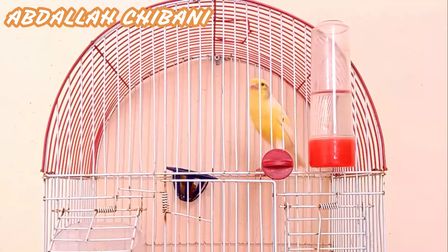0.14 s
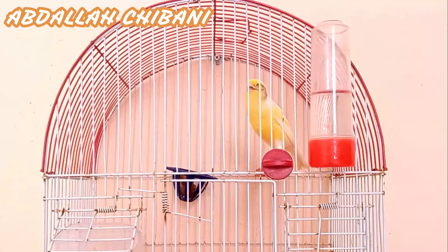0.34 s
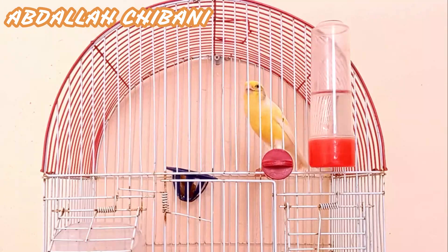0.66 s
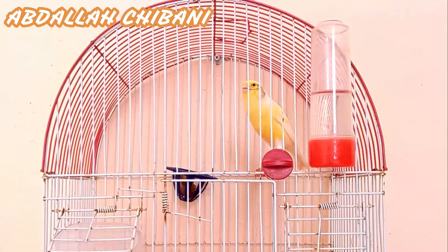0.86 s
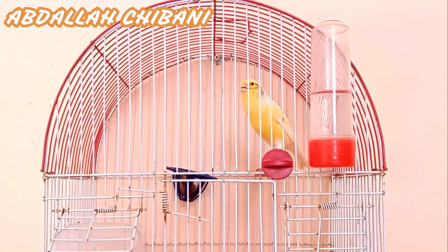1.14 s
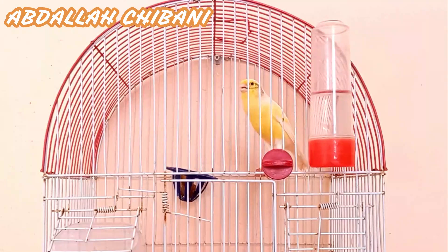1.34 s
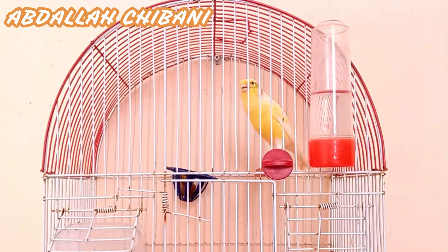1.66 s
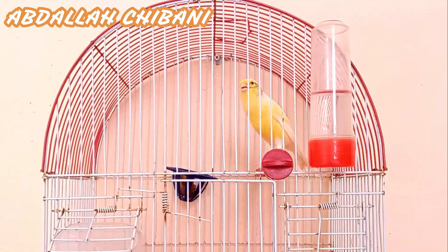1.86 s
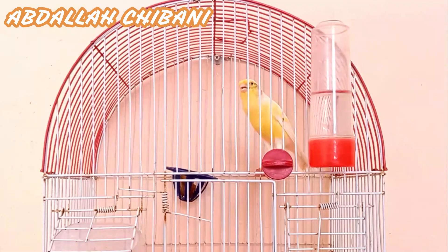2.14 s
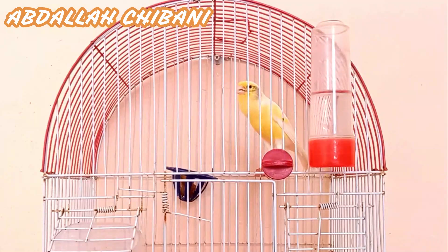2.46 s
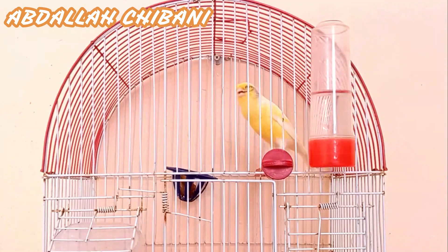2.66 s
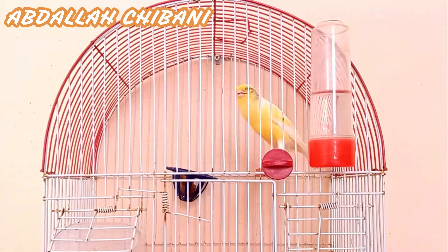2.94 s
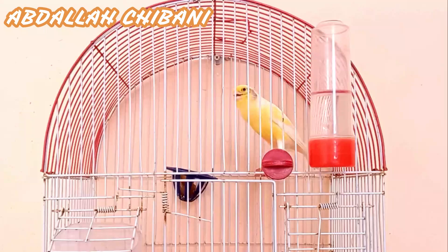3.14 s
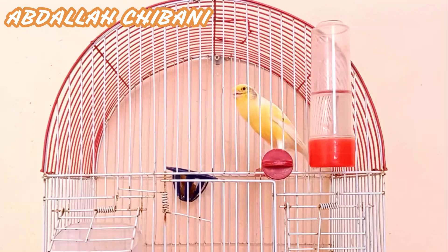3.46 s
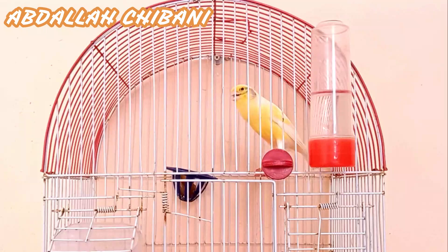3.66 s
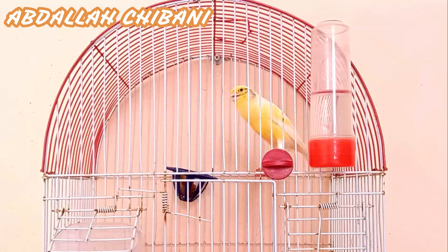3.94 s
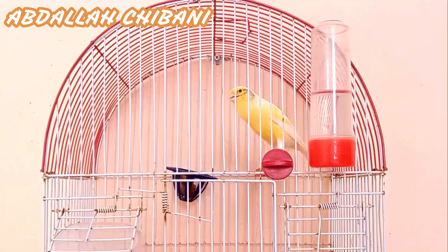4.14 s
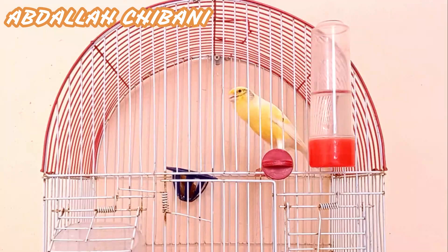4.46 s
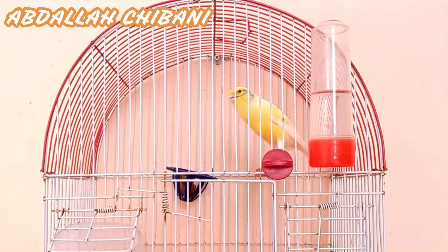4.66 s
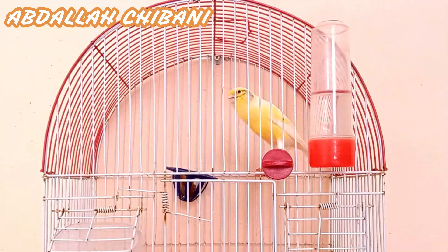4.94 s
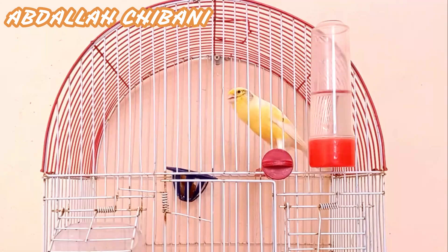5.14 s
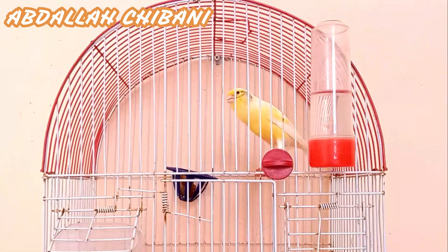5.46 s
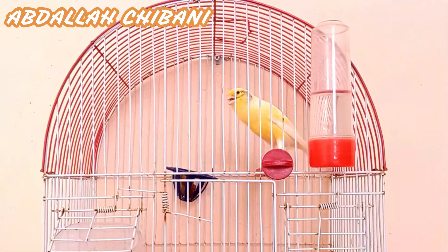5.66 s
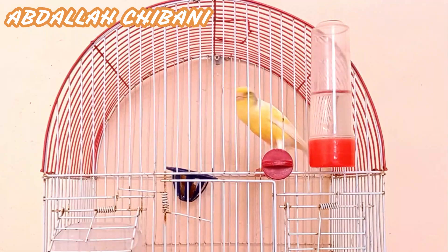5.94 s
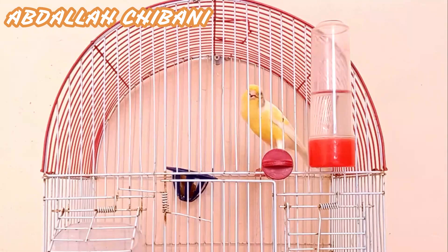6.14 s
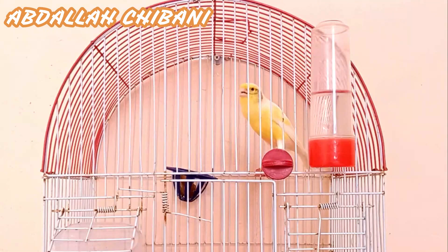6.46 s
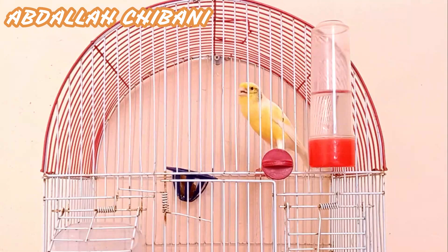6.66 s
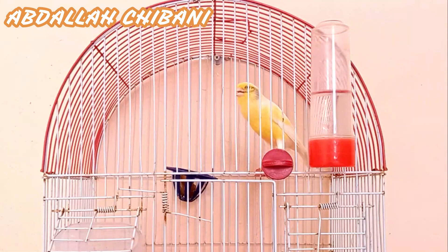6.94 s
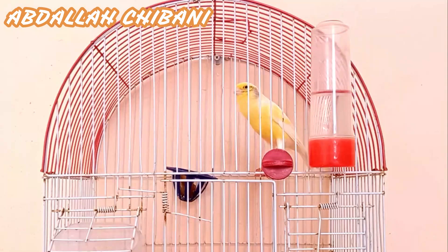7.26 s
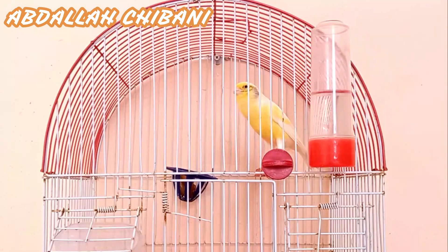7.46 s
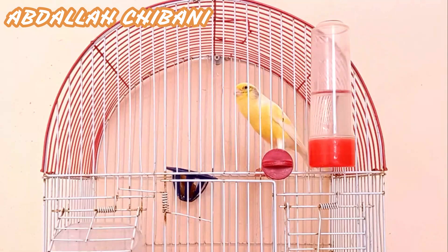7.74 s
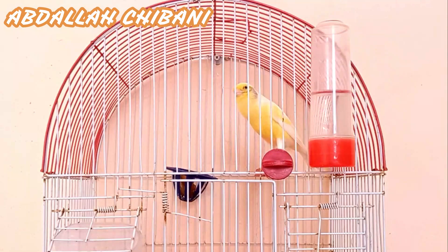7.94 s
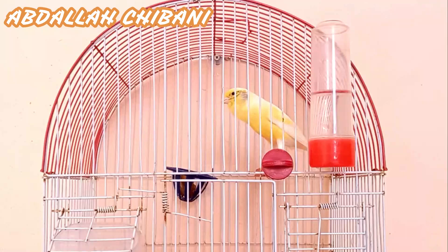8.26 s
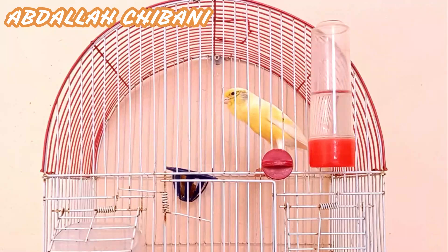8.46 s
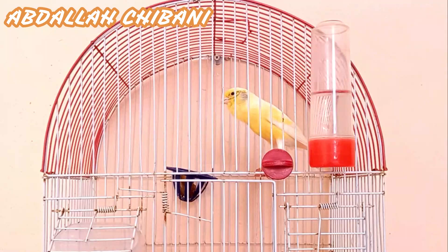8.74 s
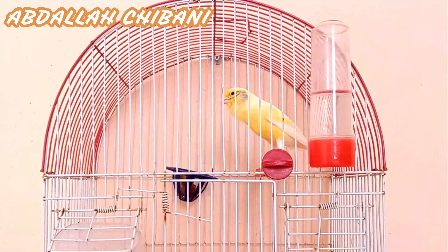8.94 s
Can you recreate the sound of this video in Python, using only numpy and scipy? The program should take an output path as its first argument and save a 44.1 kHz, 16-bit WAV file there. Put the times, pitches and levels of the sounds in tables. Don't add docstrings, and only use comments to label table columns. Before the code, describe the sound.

A caged canary sings close by in a small hard-walled room, running from fast ticking trills into falling drops, rising sweeps, slides and chips, while another answers.

```python
import sys
import numpy as np
from scipy import signal
from scipy.fft import rfft, irfft
from scipy.io import wavfile
from scipy.ndimage import uniform_filter1d

SR = 44100
rng = np.random.default_rng(int(sys.argv[2]) if len(sys.argv) > 2 else 0)


def file_out(sig):
    cols = np.atleast_2d(sig).T
    lim = np.clip(cols, -1, 1)
    pcm = np.round(lim * 32767).astype(np.int16)
    wavfile.write(sys.argv[1], SR, pcm)


def field_ratio(decibels):
    return 10 ** (np.asarray(decibels, dtype=float) / 20)


N = 401310
LEAD = SR // 2
UNEVEN_DB = 1.3

# columns from_mark_ms, pitch_hz, level_db
TICK = [
    [(-9, 3900, -5), (-4, 4900, -2), (-1, 5250, 1), (3, 6700, -3), (7, 7300, -4)],
]
TOCK = [
    [(-38, 1700, -20), (-31, 2250, -13), (-26, 2640, 2), (-21, 2730, 1), (-16, 2740, -7)],
]
DROP = [
    [(-24, 6600, -36), (-15, 5500, -24), (-8, 4800, -14), (-3, 4250, -4), (2, 3900, 0), (8, 3600, -5),
     (11, 3450, -12)],
]
RISE = [
    [(-2, 2700, -20), (8, 3100, -9), (20, 3520, -1), (32, 3880, 0), (48, 4250, -4), (60, 4385, -2),
     (72, 4375, -4)],
]
FALL = [
    [(0, 7450, -20), (25, 6800, -21), (42, 5900, -17), (52, 5300, -7), (62, 5000, -9), (68, 4400, -14)],
]
SLIDE = [
    [(0, 7400, -20), (40, 6400, -21), (75, 5200, -17), (108, 4250, -11), (122, 3850, 1), (136, 3550, -5)],
    [(160, 2500, -26), (165, 2050, -19), (172, 1550, -17)],
]
CHIP = [
    [(0, 7050, -4), (6, 6200, -4)],
    [(7, 5250, -2), (11, 4950, 2), (17, 4700, -2)],
]
CHUP = [
    [(-5, 6500, -3), (3, 5500, -3)],
    [(5, 5000, -2), (12, 4400, -2)],
]
SCOOP = [
    [(-6, 1800, -18), (3, 2300, -4), (12, 2650, 0), (22, 2750, -4)],
]
FLICK = [
    [(28, 4900, -1), (32, 6300, 1), (37, 6900, -2), (44, 7000, -6)],
]
CLIMB = [
    [(0, 2500, -16), (30, 3300, -2), (60, 4250, -4), (80, 4430, -2)],
]
DIP = [
    [(60, 4900, -14), (68, 4200, -6), (75, 3500, -2), (81, 2900, -1), (86, 2550, -9), (91, 1900, -20)],
]
PIP = [
    [(0, 4300, -4), (10, 4420, 0), (35, 4400, -2)],
]
HOOK = [
    [(0, 2100, -8), (15, 2650, 0), (35, 2800, -3)],
]
BEAD = [
    [(0, 2120, -3), (10, 2240, 0), (28, 2220, -2)],
]
BURR = [
    [(0, 4000, -8), (10, 3500, 0), (20, 2900, -3), (33, 1250, -12)],
]

# columns start_s, level_db
FALLS = [(4.695, -5.3), (4.823, -2.3), (4.953, 0.0), (5.086, -5.7), (5.211, -3.1), (5.34, -0.6),
         (5.481, -1.8), (5.611, -0.2), (5.744, -1.5), (5.878, -4.3), (6.008, -3.3)]
SLIDES = [(6.145, 0.0), (6.36, -1.6), (6.575, -2.6), (6.79, -1.8), (7.01, -3), (7.235, -1.5)]
CHIPS = [(7.7, -7.9), (7.951, 0.0), (8.174, -5.6), (8.45, -4.1)]
CHUPS = [(7.8, 0.0), (8.07, -2.1)]
# columns syllable, marks, voice (level_db, second_partial_db, third_partial_db),
# and optionally pitch (first_factor, last_factor)
NEAR_PHRASES = [
    (FALL, FALLS, (-15, -19, -34)),
    (DIP, FALLS, (-15.5, -30, -40)),
    (SLIDE, SLIDES, (-13, -25, -34)),
    (CHIP, CHIPS, (-24.5, -17, -29), (1.03, .965)),
    (CHUP, CHUPS, (-31, -9, -28)),
]

# (first_s, last_s, level_db, first_pitch_factor, last_pitch_factor)
FAR_ROLLS = [
    (HOOK, .0435, [(-.3, .6, -29, 1.3, 1.46), (7.5, 8.3, -50, 1.7, 1.1)]),
    (HOOK, .054, [(.612, 1.16, -16, 1.21, 1.13)]),
    (HOOK, .059, [(4.84, 5.42, -22, 1.26, 1.46), (5.48, 5.8, -22, 1.35, 1.35)]),
    (HOOK, .071, [(6.755, 7.55, -27, 1.02, .93)]),
    (BURR, .046, [(3.6, 4.4, -42, .65, .65), (4.9, 5.6, -42, .8, .8), (8.49, 8.55, -42, .85, .85), (8.56, 9.1, -29.5, .88, 1.03)]),
    (PIP, .0605, [(5.455, 5.72, -21, .999, .99)]),
    (CLIMB, .092, [(5.626, 6.84, -21, 1.01, .99)]),
    (BEAD, .0345, [(7.505, 8.45, -24, .985, 1.01)]),
]
# columns start_s, length_s, start_hz, end_hz, level_db
FAR_NOTES = [(.885, .025, 3400, 4100, -18), (.94, .04, 3620, 3740, -16), (1.005, .05, 4340, 4420, -18),
             (1.075, .04, 4380, 4390, -19.5), (1.135, .04, 4380, 4390, -20), (2.12, .03, 1900, 1550, -34),
             (2.218, .035, 3000, 2150, -24), (2.335, .04, 3150, 2150, -19), (3.232, .012, 1700, 2600, -38),
             (4.2, .05, 5000, 5400, -44), (4.66, .09, 3500, 3400, -17), (4.92, .15, 4900, 4800, -32),
             (7.455, .012, 6300, 5400, -33), (7.545, .02, 2810, 2830, -28), (8.35, .015, 5500, 6300, -28),
             (8.485, .012, 2900, 3000, -36), (9.085, .02, 4100, 4300, -26)]

# columns start_s, level_db, centre_hz
THUDS = [
    (.87, -56, 150),
    (.97, -48, 110),
    (1.6, -50, 300),
    (2.25, -38, 600),
    (6.45, -52, 300),
]
# columns pitch_hz, level_db (per Hz)
HOUSE_COLOUR = [(20, -11), (150, -8), (320, 2), (650, -3), (1200, -10), (2200, -12), (4000, -15),
                (6000, -27), (9500, -26), (15000, -34)]
# columns pitch_hz, t60_s
WALL_RINGING = [(200, .7), (1000, .8), (2300, .75), (3500, 1.05), (4500, 1.05), (7000, .8), (10000, .6),
                (15000, .4)]
# columns delay_s, level_db
ECHOES = [
    (.0035, -8),
    (.0095, 0),
    (.0145, -8),
    (.019, -7),
]
# columns pitch_hz, level_db
MIC_COLOUR = [(9, -40), (38, 0), (4500, 0), (6000, -4), (7400, -6), (7900, -6), (8600, 0), (9700, 5),
              (11800, -8), (14500, 1)]

# columns first_s, last_s, mean_gap_s, slowing_share, end_fade_db
TICK_TRILL = (-.37, 1.016, .0578, .065, 2)
DROP_TRILL = (1.114, 2.643, .0437, .034, -4)
RISE_TRILL = (2.667, 4.601, .0841, .027, -2.2)
SCOOP_TRILL = (1.153, 2.096, .0725, .066, -1.5)
# (level_db, second_partial_db, third_partial_db)
NEAR_TRILLS = [
    ([TOCK, TICK], TICK_TRILL, [(-16.5, -44, -40), (-31.5, -20, -34)]),
    ([DROP], DROP_TRILL, [(-15.3, -25, -34)]),
    ([RISE], RISE_TRILL, [(-12.2, -46, -37)]),
]

# columns start_s, end_s, start_hz, sag_hz_per_s
LONG_NOTE = (4.2, 4.66, 3670, -370)
# columns peak_s, level_db
PUSHES = [
    (4.282, -10),
    (4.42, -9.5),
    (4.55, -11),
    (4.63, -11),
]
# columns start_s, deep_db, household_db, dying_db_per_s
STIRS = [(0, -76, -50, 60), (.8, -66, -55, 10), (1.01, -53, -52, 25), (1.62, -65, -49, 35),
         (2.3, -66, -35, 36), (2.85, -59, -50, 4.5), (5.4, -68, -50, 14), (6.3, -66, -60, 10),
         (6.56, -67, -51, 35), (7.33, -66, -64, 30), (8.4, -78, -59, 4)]


def read(points, hz):
    f, value = np.transpose(points)
    return np.interp(np.log(hz + 1), np.log(f + 1), value)


def add(mix, s, sound):
    part = mix[round(s * SR) + LEAD:][:len(sound)]
    part += sound[:len(part)]


def whistle(s, hz, db, second_db, third_db):
    edge_s = .004
    t = np.arange(s[0], s[-1], 1 / SR)
    wobble = 1 + .004 * np.sin(2 * np.pi * 90 * t)
    glide = uniform_filter1d(np.interp(t, s, hz), size=90, mode="nearest")
    phase = 2 * np.pi * np.cumsum(glide * wobble) / SR
    tone = np.sin(phase)
    tone += field_ratio(second_db) * np.sin(2 * phase)
    tone += field_ratio(third_db) * np.sin(3 * phase)
    fade = signal.windows.tukey(len(t), min(2 * edge_s * SR / len(t), 1))
    return np.sqrt(2) * field_ratio(np.interp(t, s, db)) * fade * tone


def phrase(syllable, marks, voice, pitch=(1, 1), scatter=.007):
    out = np.zeros(N + LEAD)
    level_db, second_db, third_db = voice
    factors = np.linspace(*pitch, len(marks)) + scatter * rng.standard_normal(len(marks))
    for (start, mark_db), factor in zip(marks, factors):
        for note in syllable:
            ms, hz, note_db = np.transpose(note)
            s = start + ms / 1000
            add(out, s[0], whistle(s, hz * factor, level_db + mark_db + note_db, second_db, third_db))
    return out


def trill(first, last, gap, slowing, fade_db):
    opening_db = 1.1
    u = np.linspace(0, 1, round((last - first) / gap) + 1)
    s = first + (last - first) * (u - slowing * u * (1 - u))
    db = fade_db * u + opening_db * (u == 0) + UNEVEN_DB * rng.standard_normal(len(u))
    return np.transpose([s, db])


def near_bird():
    out = sum(phrase(*row) for row in NEAR_PHRASES)
    for syllables, rule, voices in NEAR_TRILLS:
        marks = trill(*rule)
        for syllable, voice in zip(syllables, voices):
            out += phrase(syllable, marks, voice)
    return out


def far_bird():
    scoops = trill(*SCOOP_TRILL)
    out = phrase(SCOOP, scoops, (-21.5, -40, -46), scatter=.02)
    out += phrase(FLICK, scoops[7:12], (-32.5, -30, -46))
    for syllable, gap, rows in FAR_ROLLS:
        scatter = .035 if syllable in (HOOK, BURR) else .006
        for first, last, db, *pitch in rows:
            s = np.arange(first, last, gap)
            marks = np.transpose([s, UNEVEN_DB * rng.standard_normal(len(s))])
            out += phrase(syllable, marks, (db, -36, -40), pitch, scatter)
    for start, length, hz, end_hz, db in FAR_NOTES:
        s = start + length * np.array([0, .5, 1])
        glide = hz + (end_hz - hz) * np.array([0, .6, 1])
        add(out, start, whistle(s, glide, [db, db, db], -32, -36))
    add(out, *long_note())
    return out


def room(x, direct_db, echo_db, wet_db):
    build_up_s = .012
    hz, t, z = signal.stft(rng.standard_normal(SR), SR, nperseg=256)
    z = z * field_ratio(-60 * t / read(WALL_RINGING, hz)[:, None])
    response = signal.istft(z, SR, nperseg=256)[1]
    response *= np.minimum(np.arange(len(response)) / SR / build_up_s, 1) ** 2
    response *= field_ratio(wet_db) / np.linalg.norm(response)
    response[0] = field_ratio(direct_db)
    for s, db in ECHOES:
        response[round(s * SR)] += field_ratio(db + echo_db)
    return signal.oaconvolve(x, response)[LEAD:LEAD + N]


def house():
    quiet_deep_db, quiet_household_db, calming_db_per_s = -70, -57, -.9
    rise_db_per_s, split_hz, hiss_db = 160, 180, -72
    hz, t = np.fft.rfftfreq(N, 1 / SR), np.arange(N) / SR
    level = field_ratio(np.array([[quiet_deep_db], [quiet_household_db]]) + calming_db_per_s * t)
    for s, deep_db, household_db, dying in STIRS:
        swell = field_ratio(np.minimum(rise_db_per_s * (t - s), -dying * (t - s)))
        level = np.hypot(level, field_ratio(np.array([[deep_db], [household_db]])) * swell)
    z = rfft(rng.standard_normal(N)) * field_ratio(read(HOUSE_COLOUR, hz))
    low = 1 / (1 + (hz / split_hz) ** 4)
    deep = irfft(z * low, N)
    household = irfft(z * (1 - low), N)
    hiss = field_ratio(hiss_db) * rng.standard_normal(N)
    return deep / deep.std() * level[0] + household / household.std() * level[1] + hiss


def thuds():
    out = np.zeros(N + LEAD)
    t = np.arange(SR // 10) / SR
    for s, db, hz in THUDS:
        band = signal.butter(1, [.6 * hz, 2.5 * hz], "band", fs=SR)
        puff = signal.lfilter(*band, rng.standard_normal(len(t)))
        add(out, s, field_ratio(db + 16 - 900 * t) * puff)
    return out


def long_note():
    push_slope_db_per_s = 190
    start, end, start_hz, sag = LONG_NOTE
    s = np.arange(start, end, .005)
    db = np.max([top_db - push_slope_db_per_s * abs(s - at) for at, top_db in PUSHES], axis=0)
    return start, whistle(s, start_hz + sag * (s - start), db, -42, -34)


def scene():
    birds = room(near_bird(), direct_db=-4.5, echo_db=-7.5, wet_db=-2.9)
    birds += room(far_bird(), direct_db=-7, echo_db=-10, wet_db=-1.8)
    knocks = room(thuds(), direct_db=-12, echo_db=-12, wet_db=-1)
    return (birds + knocks + house())[None]


def roll_off(x):
    return signal.sosfilt(signal.butter(12, 15720, fs=SR, output="sos"), x)


def record(dry):
    drive, lopsided = .55, .045
    low_share, corner_hz = .25, 4000
    hz = np.fft.rfftfreq(N, 1 / SR)
    haze_colour = low_share + (1 - low_share) / (1 + (corner_hz / (hz + 1)) ** 8)
    haze = rfft(lopsided * dry ** 2) * haze_colour
    bent = rfft(np.tanh(drive * dry) / drive)
    coloured = irfft((bent + haze) * field_ratio(read(MIC_COLOUR, hz)), N)
    return roll_off(coloured)


dry = scene()
out = record(dry)
file_out(out)
```